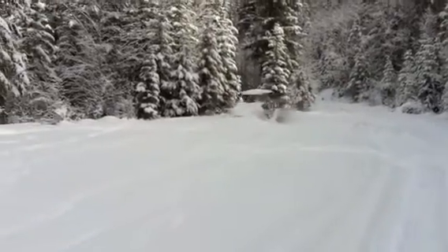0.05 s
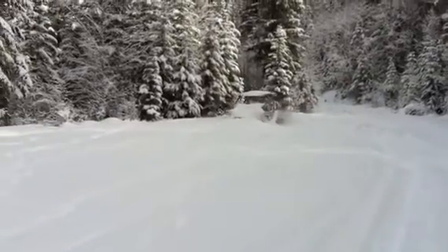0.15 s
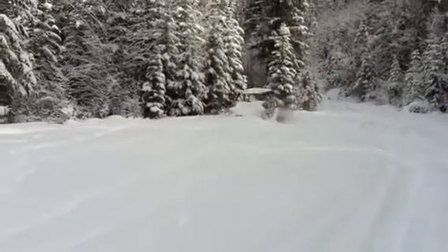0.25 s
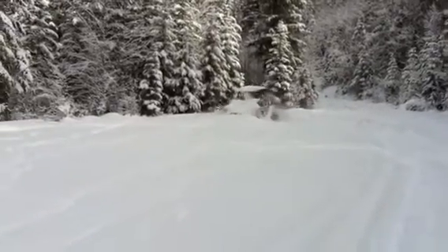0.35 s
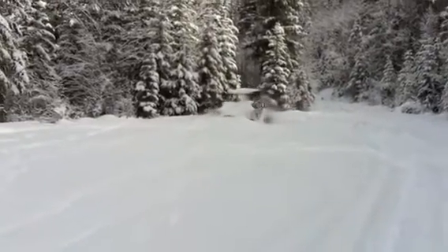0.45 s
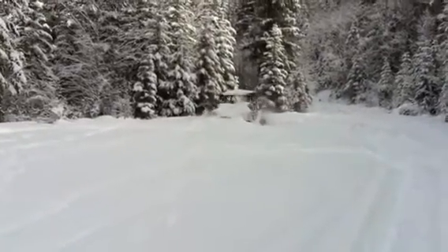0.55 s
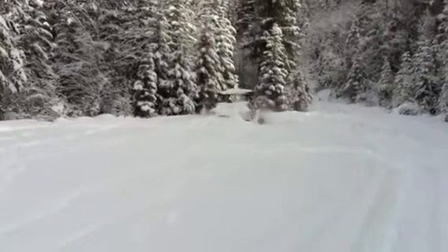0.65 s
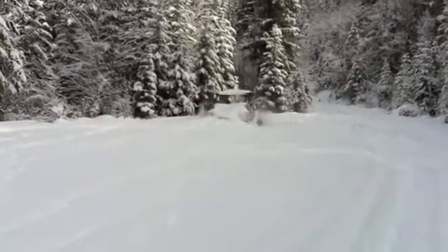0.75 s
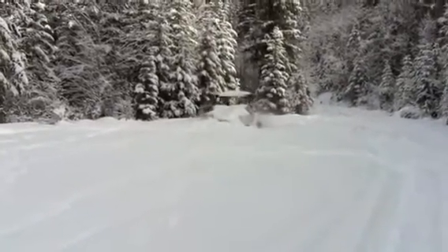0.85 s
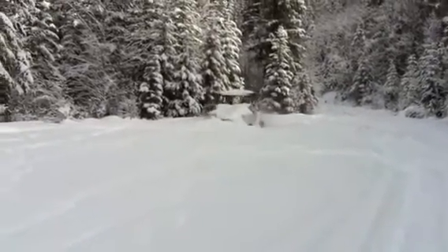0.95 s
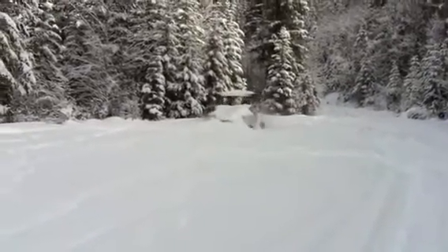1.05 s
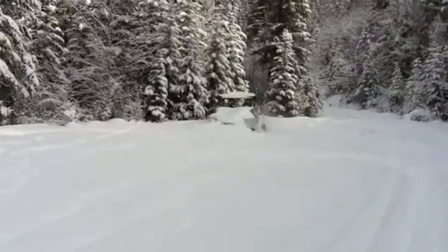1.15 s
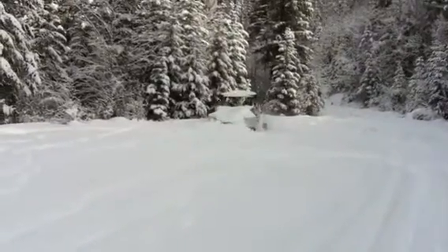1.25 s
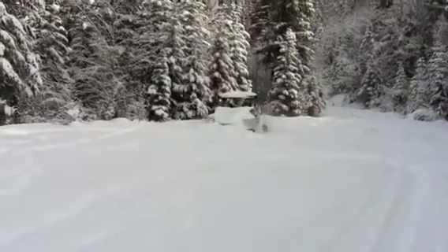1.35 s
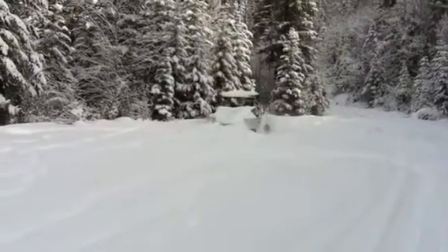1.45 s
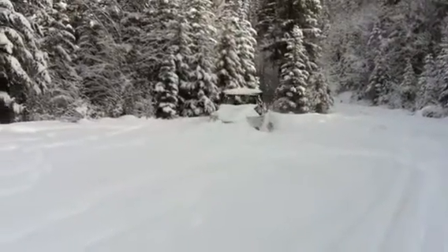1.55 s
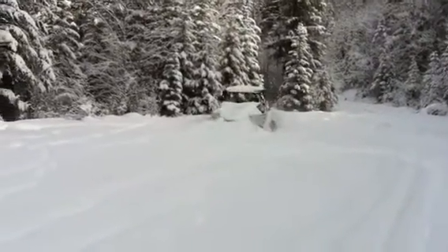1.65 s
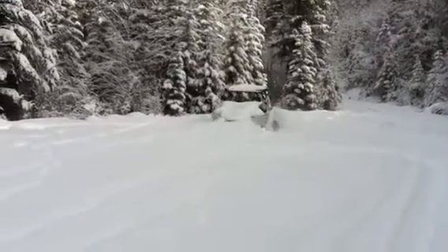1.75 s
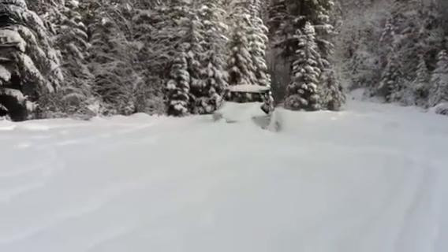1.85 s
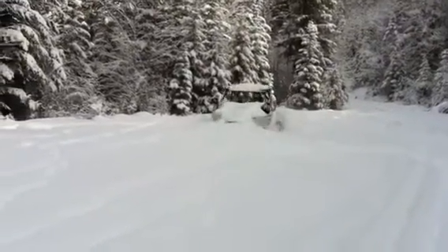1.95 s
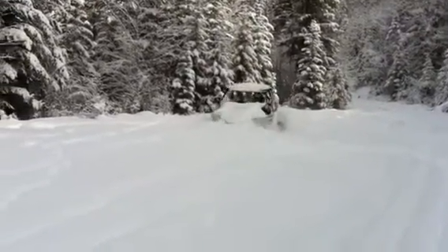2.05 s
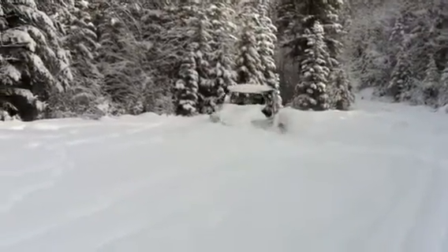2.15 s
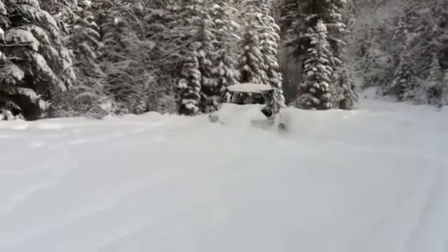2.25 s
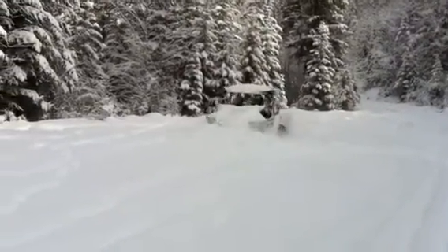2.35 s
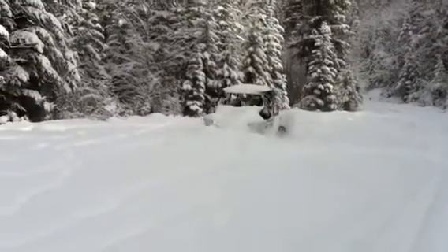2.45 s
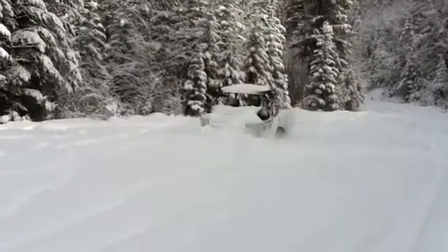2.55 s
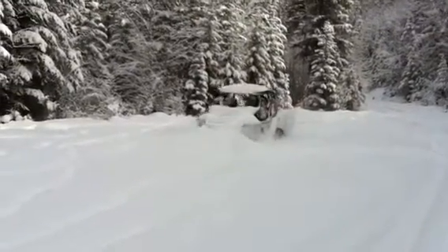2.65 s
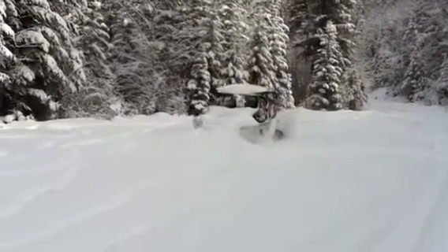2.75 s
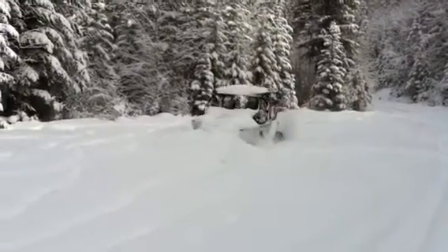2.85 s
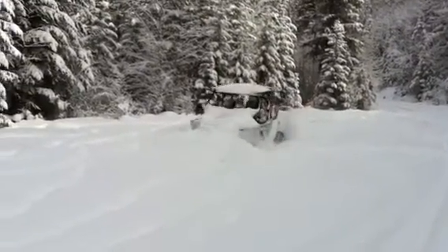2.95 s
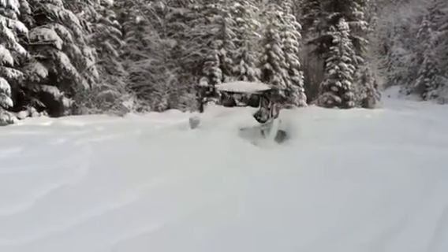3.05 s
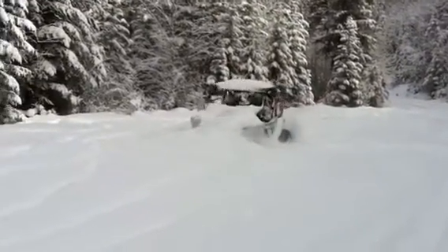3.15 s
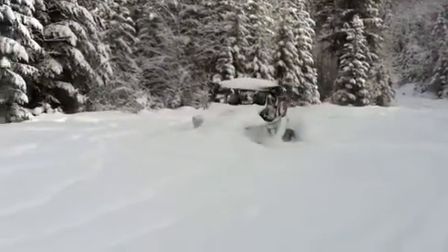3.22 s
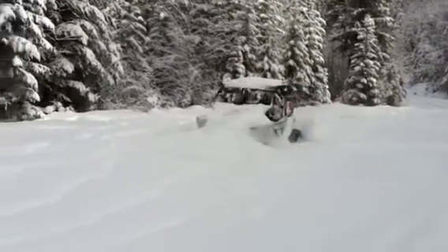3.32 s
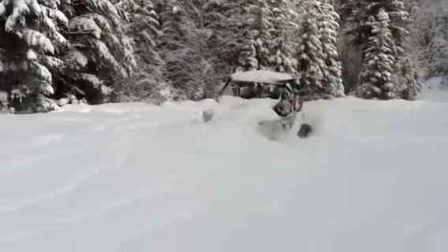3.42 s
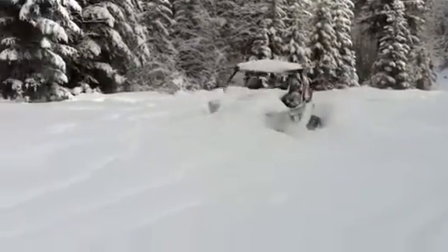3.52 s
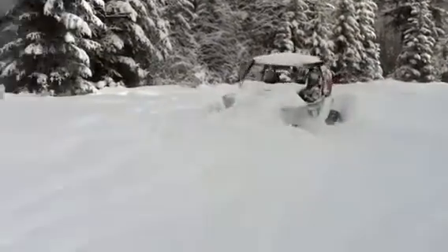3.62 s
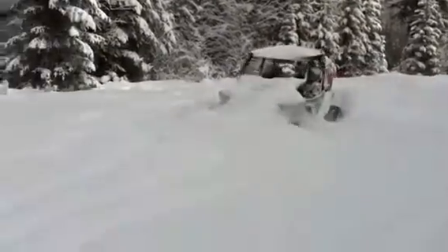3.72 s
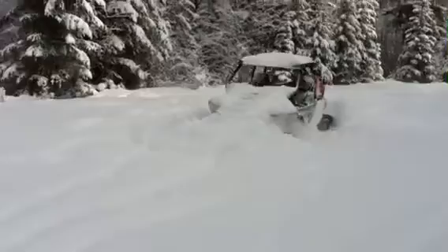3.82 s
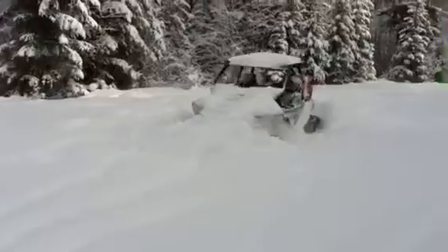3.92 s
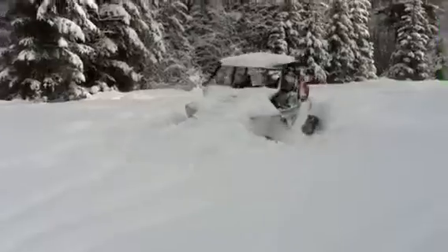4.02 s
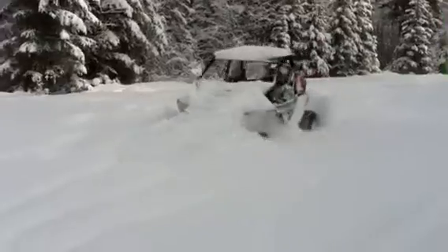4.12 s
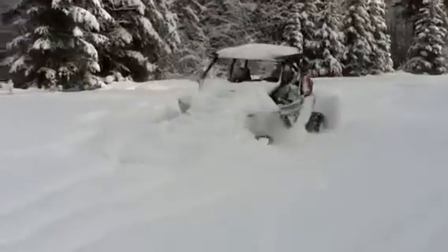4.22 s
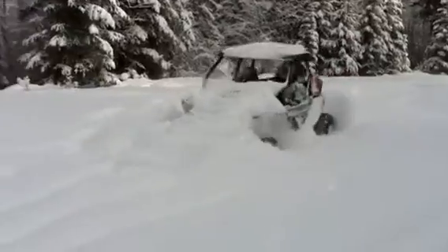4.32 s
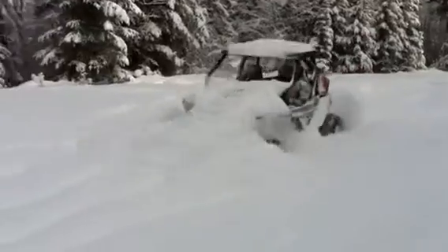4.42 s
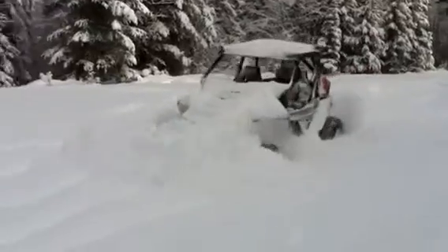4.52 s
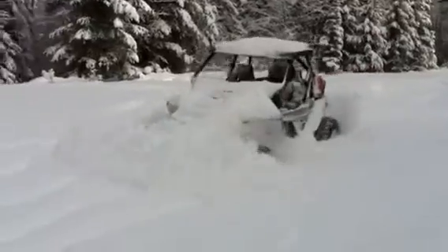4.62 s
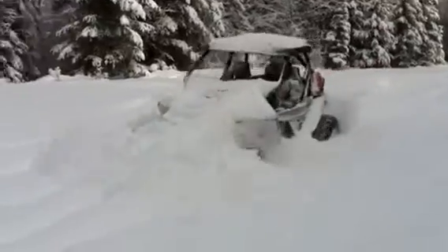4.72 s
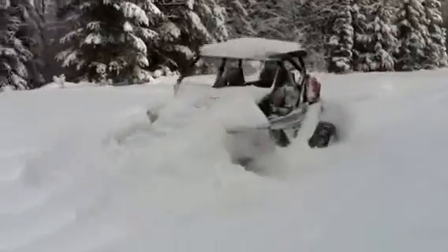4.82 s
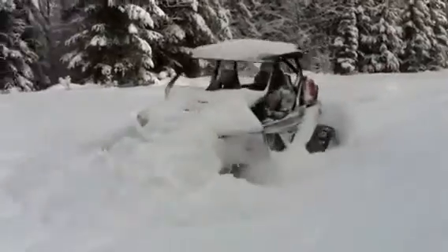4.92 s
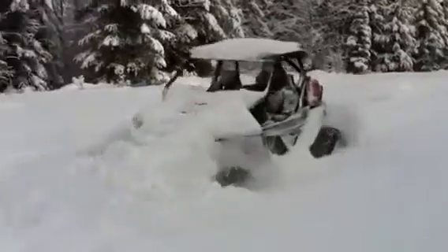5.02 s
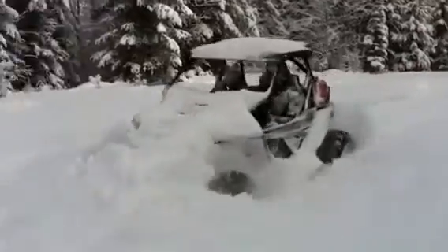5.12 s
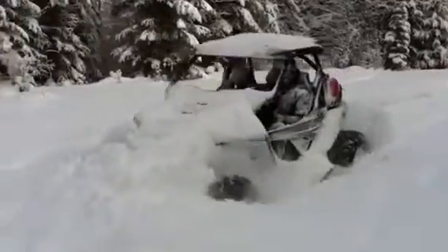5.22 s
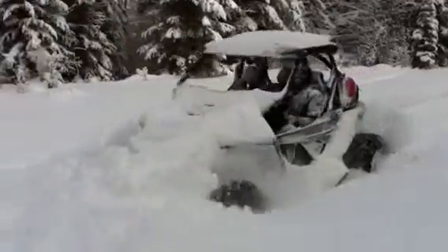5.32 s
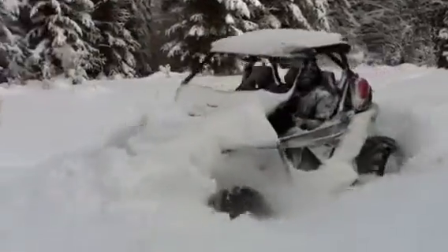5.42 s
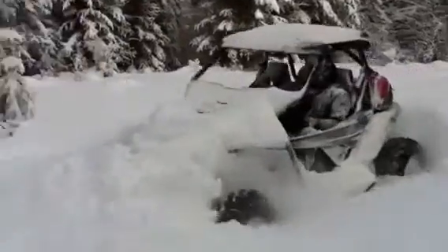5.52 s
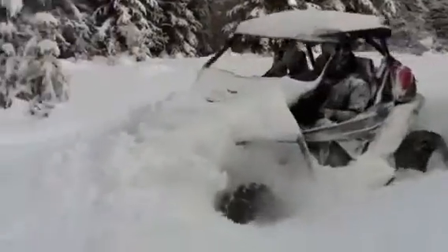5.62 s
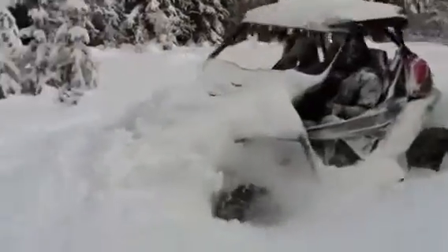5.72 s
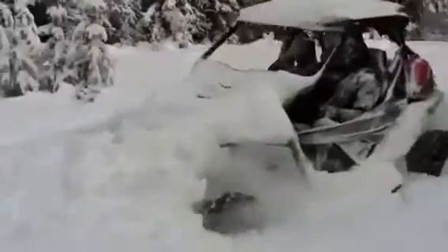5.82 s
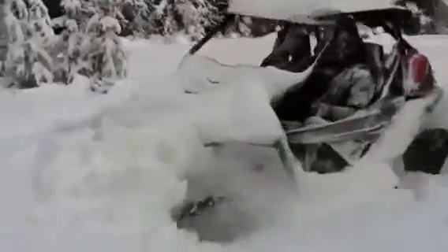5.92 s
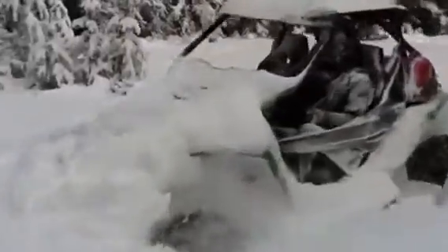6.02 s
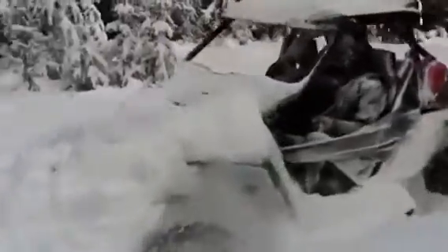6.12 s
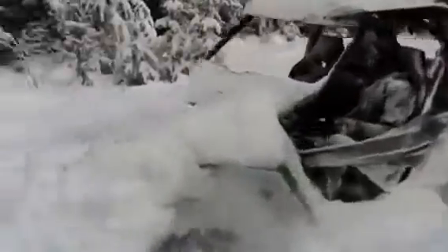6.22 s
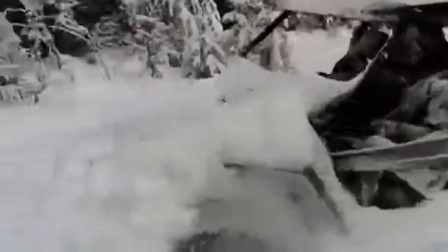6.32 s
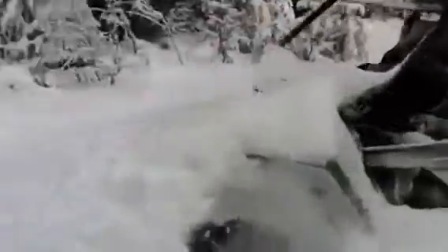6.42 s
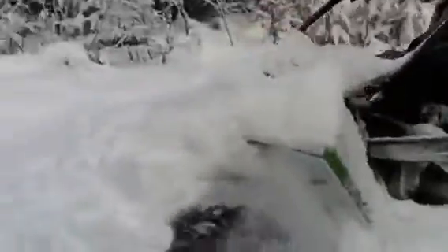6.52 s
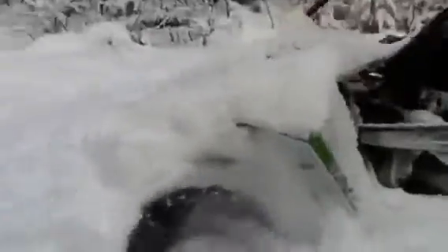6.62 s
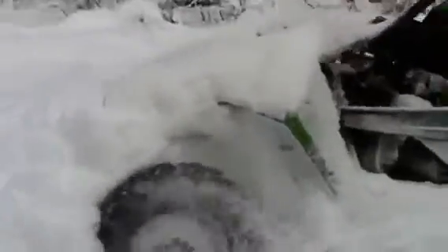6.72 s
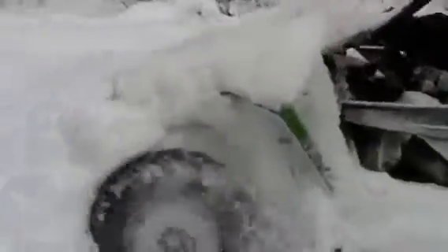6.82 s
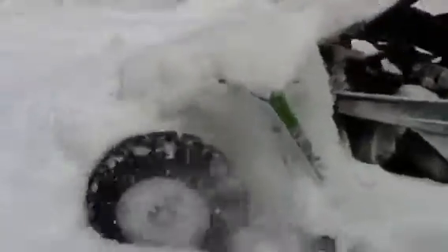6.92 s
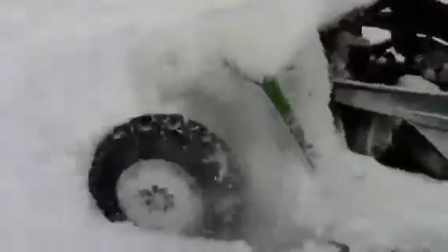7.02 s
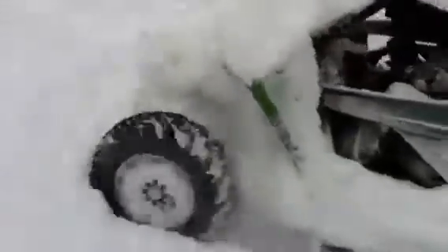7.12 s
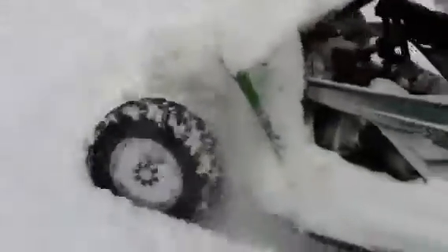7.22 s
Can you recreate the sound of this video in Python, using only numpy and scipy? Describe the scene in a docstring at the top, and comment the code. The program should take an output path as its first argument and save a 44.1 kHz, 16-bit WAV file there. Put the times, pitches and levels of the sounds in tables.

```python
"""A side-by-side buggy ploughs through deep snow, closing from about 25 m to under 5 m from the microphone.
Its four-stroke twin is held near 6000 rpm: summed orders of the firing cycle make the exhaust drone, noise
pulses make its puffs and the engine clatter, and a wavering sine makes the drive whine. Shaped noise hisses
as belt and thrown snow, coloured by a shifting reflection; tyres rumble and the chassis knocks."""
import sys
import numpy as np
from scipy import signal
from scipy.fft import rfft, irfft, next_fast_len
from scipy.io import wavfile
from scipy.ndimage import uniform_filter1d, map_coordinates

SR = 44100
rng = np.random.default_rng(int(sys.argv[2]) if len(sys.argv) > 2 else 0)


def wav_out(sig):
    """Save sig, one row per channel (or a flat mono array), as 16-bit PCM at SR to the path in sys.argv[1]."""
    wavfile.write(sys.argv[1], SR, np.round(np.clip(np.atleast_2d(sig).T, -1, 1) * 32767).astype(np.int16))


N = 320166
TIME = np.arange(N) / SR  # seconds

# Engine speed. Each row: time in seconds, four-stroke cycles per second.
ENGINE_SPEED = [(0.0, 49.2), (0.32, 48.6), (0.74, 50.3), (0.98, 49.5), (1.48, 50.5), (1.92, 50.2),
                (2.13, 50.8), (2.28, 50.5), (2.51, 49.3), (3.55, 49.6), (3.61, 50.1), (4.01, 50.1),
                (4.11, 49.6), (5.96, 49.8), (6.28, 49.2), (6.6, 49.7), (7.0, 49.6), (7.2, 51.0)]
# How the buggy's character changes. Each row: time in seconds, place (0 far, 1 midway, 2 close, 3 alongside;
# past 3 only the throb of hiss and spray still grows), extra delay of the reflection in ms.
PATH = [(0, 0.5, 0.28), (2.0, 0, 0.28), (3.2, 0.5, 0.28), (4.2, 0.2, 0.3), (5.1, 1, 0.29), (5.8, 2, 0.32),
        (6.25, 2, 0.32), (6.44, 2.5, 0.342), (6.7, 3, 0.36), (7.26, 4.5, 0.37)]
# How well the parts of the exhaust carry; alongside, the boom takes over.
# Each row: time in seconds, drone offset in dB, boom offset in dB, bark offset in dB.
EXHAUST_CARRY = [(0, -2, -3, 2), (.7, 0.5, -2.2, -1), (1.15, 1, 0, 0), (4.5, .6, 0.6, -.5),
                 (5.5, -2, -3.2, 0.5), (5.95, -1, -1.6, 1.5), (6.4, -4.5, 3, 1.5), (7.0, -11, 3.5, -1.5),
                 (7.25, -15, 4, -6)]
# Balance of the exhaust orders at each place, before the top is softened and each group is levelled.
# Each row: multiple of the cycle rate, relative level in dB.
ORDERS_FAR = [(1, -32), (2, -19), (3, -3), (4, 1), (5, 0), (6, -10.5), (7, -14), (8, -9.5), (9, -15.5),
              (10, -24), (11, -36), (12, -10), (13, -15.5), (14, -15), (15, -19), (16, -14), (17, -14.5),
              (18, -11), (19, -32)]
ORDERS_MIDWAY = [(1, -35), (2, -14.5), (3, -4.5), (4, -7), (5, 0), (6, -6), (7, -18), (8, -15.5),
                 (9, -15.5), (10, -12.5), (11, -13), (12, -17.5), (13, -15), (14, -31), (15, -13),
                 (16, -34), (17, -18), (18, -14), (19, -17)]
ORDERS_CLOSE = [(1, -39), (2, -17.5), (3, -10.5), (4, -8), (5, 0), (6, -3.5), (7, -16), (8, -12.5),
                (9, -10), (10, -12.5), (11, -14), (12, -21), (13, -11.5), (14, -19), (15, -9.5),
                (16, -26.5), (17, -10), (18, -25), (19, -7.5)]
ORDERS_ALONGSIDE = [(1, -39), (2, -17.5), (3, -20), (4, -17.5), (5, 0), (6, -14), (7, -7.5), (8, -7.5),
                    (9, -13.5), (10, -12), (11, -9.5), (12, -21.5), (13, -32), (14, -25.5), (15, -38),
                    (16, -33), (17, -36), (18, -35), (19, -35)]
# Silencer chambers; close up the note chugs, less smeared.
# Each row: resonance in Hz, width far off in Hz, width close up in Hz.
SILENCER_CHAMBERS = [(108, 30, 30), (220, 14, 80), (325, 22, 22), (720, 150, 300)]
# Spectrum of the exhaust gas. Each row: frequency in Hz, relative level in dB per Hz.
GAS_SPECTRUM = [(50, -34), (80, -15), (130, -12.5), (220, 2), (300, -2), (420, -2.5), (540, -4.5),
                (700, -13), (1100, -22)]
# Firing pulses. Each row: place in the cycle from 0 to 1, relative strength.
FIRINGS = [(.19, 0.8), (.6, 0.5)]
# Spectrum of the engine clatter at each place. Each row: frequency in Hz, relative level in dB per Hz.
CLATTER_FAR = [(310, -38), (520, -5.5), (591, -17), (649, -10), (709, -1), (909, 0), (1050, -5.5),
               (1140, -2.5), (1240, -6.5), (1770, -5), (2600, -17.5), (3380, -31), (5720, -120)]
CLATTER_MIDWAY = [(310, -42), (520, -10), (603, -8), (658, 6), (789, 0.5), (916, 0.5), (1230, -2.5),
                  (1350, -8), (1420, -6.5), (1830, -4), (2600, -25.5), (3380, -48), (5720, -120)]
CLATTER_CLOSE = [(310, -34), (520, -14), (583, -21), (632, -1), (789, 0), (922, -1.5), (1290, 0.5),
                 (1470, -6.5), (1780, -4), (2370, -10), (2600, -18), (3380, -31), (5720, -120)]
CLATTER_ALONGSIDE = [(310, -33), (520, -17), (600, -3), (800, -6), (1080, -7), (1260, -4), (1470, -6),
                     (1630, 1), (1860, -4), (2050, -20), (2300, -42), (3400, -55)]
# Drive whine. Each row: time in seconds, level in dB before its flutter, multiple of the cycle rate.
DRIVE_WHINE = [(0, -66, 26.9), (2.3, -73, 26.9), (2.9, -58, 26.9), (3.8, -58, 27.0), (4.6, -52.5, 26.8),
               (5.5, -55, 26.9), (6.3, -51, 25.9), (6.7, -38.5, 25.7), (7.26, -48, 24.4)]
# Spectrum of the hiss at each place. Each row: frequency in Hz, relative level in dB per Hz.
HISS_FAR = [(1700, 0.5), (2300, -4), (3000, 2), (3600, 4), (4250, 0.5), (4900, -6), (5450, -10.5),
            (5900, -11), (7000, -11), (9000, -64)]
HISS_MIDWAY = [(1700, 0), (2400, -9.5), (3000, -7), (3600, 4.5), (3900, 5), (4130, 1), (4400, 0.5),
               (4900, -2.5), (5250, 0), (5480, -4), (5750, -4.5), (6700, -20), (9000, -34.5)]
HISS_CLOSE = [(1700, -30), (2400, -1.5), (2750, -1.5), (3150, 7), (3500, -1.5), (3850, 3), (4080, 0),
              (4300, -5), (5000, -5.5), (5400, -6.5), (6000, -13), (6700, -5), (9000, -22)]
HISS_ALONGSIDE = [(1700, 0), (2300, -8), (2900, 1), (3400, -2), (3850, -1), (4300, -9), (5000, -6),
                  (5900, -1.5), (6700, -15.5), (9000, -40)]
# Resonances of the clutch housing under the hiss. Each row: frequency in Hz, width in Hz.
CLUTCH_HOUSING = [(4120, 130), (5460, 180)]
# Level of its two rings against the broad hiss; they fade as the buggy draws alongside.
# Each row: time in seconds, lower ring in dB, upper ring in dB.
HOUSING_RING = [(0, -19, -19), (2.5, -14, -19), (3.9, -22, -8.5), (4.7, -13, -10), (5.4, -20, -12.5),
                (6.1, -10.5, -21), (6.6, -37, -40)]
# Spectrum of the thrown snow, up to close and then alongside.
# Each row: frequency in Hz, relative level in dB per Hz.
SPRAY_SPECTRUM = [(4500, -30), (6200, -3.5), (7500, 0.5), (8600, -6), (10000, -8), (11500, -8),
                  (13000, -14), (14200, -7.5), (15700, -16)]
SPRAY_ALONGSIDE = [(4500, -30), (6200, -1), (7400, 1), (8500, -1), (11500, -2.5), (14200, -4.5),
                   (15700, -5)]
# Spectrum of the tyre rumble. Each row: frequency in Hz, relative level in dB per Hz.
TYRE_SPECTRUM = [(15, -8), (30, -3), (50, -1), (80, -3), (140, -8)]
# Knocks in the chassis. Each row: time in seconds, level in dB as the burst starts.
KNOCKS = [(2.887, -47), (5.725, -26), (6.168, -29), (7.138, -40)]

# A straight drive at a steady pace: when it would pass the microphone, and how far to the side
DRIVE_M_PER_S, PASS_S, PASS_M = 2.977, 8.39, 3
# Each source's base level: (dB at 10 m, dB gained each time the distance halves)
DRONE_LEVEL, BOOM_LEVEL, BARK_LEVEL = (-37.5, 11.1), (-36, 10.5), (-41.5, 14.5)
CHAMBER_LEVEL, CLATTER_LEVEL = (-53, 11), (-39.5, 11.22)
HISS_LEVEL, SPRAY_LEVEL, RUMBLE_LEVEL = (-45, 11.8), (-52.5, 13.6), (-71, 8.1)
# The drone swells with engine speed: dB per extra cycle per second
DRONE_DB_PER_HZ = 3
# The bark hardens as the engine speeds up and softens as it slows: dB per (cycle per second) each second
BARK_DB_PER_HZ_PER_S = 0.28
# The treble starts stronger and settles: how long it takes, and the extra dB at first
SETTLE_S, CLATTER_START_DB, HISS_START_DB, SPRAY_START_DB = 1.07, 3, 6.5, 8
HISS_ECHO, SPRAY_ECHO = .5, .42  # strength of the grazing reflection
START_CYCLE = 0.1714  # where in its cycle the engine starts (0-1), before its jitter
CUTOFF_HZ = 15800


def from_db(db):
    """Decibels to gain."""
    return 10 ** (np.asarray(db) / 20)


def rms_one(x):
    """Scale to rms 1."""
    return x / np.sqrt(np.mean(x ** 2) + 1e-20)


def in_time(rows):
    """Draw each column of a timed table as a curve over the samples."""
    seconds, *columns = np.transpose(rows)
    return [np.interp(TIME, seconds, column) for column in columns]


def drift(rate_hz):
    """Slow random wander of spread 1: noise through two equal low-pass poles, made at every 40th sample."""
    pole = np.exp(-80 * np.pi * rate_hz / SR)
    noise = rng.standard_normal(N // 40 + 2002)
    slow = signal.lfilter([1], [1, -2 * pole, pole * pole], noise)[2000:]  # drop the run-in
    return np.interp(np.arange(N) / 40, np.arange(len(slow)), rms_one(slow))


def colour(x, spectrum):
    """Shape a sound by a spectrum, with next to nothing past its ends; rms 1."""
    size = next_fast_len(N)
    hz, level_db = np.transpose(spectrum)
    log_hz = np.log(np.arange(size // 2 + 1) * SR / size + 1)  # +1 avoids log of zero
    gain = from_db(np.interp(log_hz, np.log(hz), level_db, left=-90, right=-90))
    return rms_one(irfft(rfft(x, size) * gain, size)[:N])


def blend(place, aspects):
    """Cross-fade between the far, midway, close and alongside aspects of the buggy."""
    place = np.clip(place, 0, len(aspects) - 1)
    return sum(np.clip(1 - abs(place - k), 0, 1) * aspect for k, aspect in enumerate(aspects))


def throb(cycle, pulses, width, depth):
    """Envelope with a bump, width in cycles, at each pulse over a steady base; rms 1."""
    bumps = 0
    for at, strength in pulses:
        from_peak = np.cos(2 * np.pi * (cycle - at)) - 1
        bumps = bumps + strength * np.exp(from_peak / (2 * np.pi * width) ** 2)
    return rms_one(1 + depth * bumps)


def approach(level, extra_db=0):
    """Gain as the buggy closes in; soft snow makes sound fall off faster than in open air."""
    db_at_10_m, db_per_halving = level
    distance_m = np.hypot(PASS_M, DRIVE_M_PER_S * (PASS_S - TIME))
    return from_db(db_at_10_m - db_per_halving * np.log2(distance_m / 10) + extra_db)


def exhaust_orders(cycle, place, group, shake, shake_rate_hz=9, soften_hz=720):
    """Harmonics of the firing cycle, phase-smeared by the silencer and shaken by uneven burning."""
    out, power = 0, 0
    closeness = np.clip(place - .7, 0, 1)
    tables = (ORDERS_FAR, ORDERS_MIDWAY, ORDERS_CLOSE, ORDERS_ALONGSIDE)
    for order in group:
        hz = order * np.mean(np.array(ENGINE_SPEED)[:, 1])
        level_db = blend(place, [np.interp(order, *np.transpose(table)) for table in tables])
        # the top orders dissolve into the clatter
        gain = from_db(level_db) / np.hypot(1, (hz / soften_hz) ** 2)
        lag_far, lag_close = sum(2 * np.arctan(2 * (hz - centre) / np.array(widths))
                                 for centre, *widths in SILENCER_CHAMBERS)
        lag = lag_far + closeness * (lag_close - lag_far)
        angle = 2 * np.pi * order * cycle - lag
        steady = (1 + shake * drift(shake_rate_hz)) * np.cos(angle)
        unsteady = shake * drift(shake_rate_hz) * np.sin(angle)
        out = out + gain * (steady + unsteady)
        power = power + gain ** 2 * (1 / 2 + shake ** 2)
    return out / np.sqrt(power)  # expected rms 1


def chambers(ring_hz=224, width_hz=22):
    """Uneven burning stirs the middle silencer chamber: noise rings through two resonators, amid the drone."""
    b, a = signal.iirpeak(ring_hz, ring_hz / width_hz, fs=SR)
    once = signal.lfilter(b, a, rng.standard_normal(N))
    return approach(CHAMBER_LEVEL) * rms_one(signal.lfilter(b, a, once))


def exhaust(cycle, place, speed):
    """Clean low orders, a boom on the pipe resonance, rougher upper orders and a puff of gas each cycle."""
    drone_db, boom_db, bark_db = in_time(EXHAUST_CARRY)
    throttle_db = DRONE_DB_PER_HZ * (speed - speed.mean())
    pull_db = BARK_DB_PER_HZ_PER_S * uniform_filter1d(np.gradient(speed) * SR, size=SR // 8)
    drone = exhaust_orders(cycle, place, range(1, 5), shake=0.12)
    drone = approach(DRONE_LEVEL, drone_db + throttle_db) * drone
    boom = approach(BOOM_LEVEL, boom_db) * exhaust_orders(cycle, place, [5], shake=0.033)
    bark = exhaust_orders(cycle, place, range(6, 20), shake=0.36, shake_rate_hz=11.2)
    puffs = throb(cycle, [(.1, 0.61)], width=0.086, depth=2)
    gas = colour(rng.standard_normal(N) * puffs, GAS_SPECTRUM)
    rough = approach(BARK_LEVEL, bark_db + pull_db) * (bark + from_db(-6) * gas)
    flutter = from_db(0.33 * drift(29))
    return (drone + boom + chambers() + rough) * flutter


def rattle(cycle, regular, size=900):
    """Valves and pistons: one share of the noise recurs with the cycle, the rest is always new."""
    regular = np.clip(regular, 0, 1)
    at = (cycle % 1) * size
    # four looped noise patterns drift in and out
    repeating = sum(drift(1.57) * np.interp(at, np.arange(size), pattern)
                    for pattern in rng.standard_normal((4, size)))
    return np.sqrt(regular) * rms_one(repeating) + np.sqrt(1 - regular) * rng.standard_normal(N)


def clatter(cycle, place):
    """Each firing shakes the engine casing and body panels, some harder than others."""
    strokes = throb(cycle, FIRINGS, width=.075, depth=1.5)
    blows = rattle(cycle, regular=0.25) * strokes * from_db(0.3 * drift(45))
    spectra = (CLATTER_FAR, CLATTER_MIDWAY, CLATTER_CLOSE, CLATTER_ALONGSIDE)
    return blend(place, [colour(blows, spectrum) for spectrum in spectra])


def whine(speed, wander_cycles=0.2):
    """A wavering sine for the gears, sagging against the engine speed as the belt drive shifts."""
    level_db, ratio = in_time(DRIVE_WHINE)
    angle = 2 * np.pi * (np.cumsum(ratio * speed) / SR + wander_cycles * drift(12))
    return from_db(level_db + 2.1 * drift(18)) * np.sqrt(2) * np.sin(angle)


def reflected(x, delay_ms, strength):
    """A grazing reflection arrives inverted and cuts evenly spaced notches; rms 1."""
    echo = map_coordinates(x, [np.arange(N) - delay_ms * SR / 1000], order=3)
    return rms_one(x - strength * echo)


def hiss(cycle, place, delay_ms):
    """Belt and valve-gear noise, throbbing more clearly close up, with the clutch housing's forward ring."""
    pulses = [(.2, 0.72), (.58, 0.65)]  # (place in the cycle, strength)
    air = rng.standard_normal(N) * throb(cycle, pulses, width=0.086, depth=0.31 + 0.079 * place ** 2)
    air = air * from_db(0.72 * drift(27))
    spectra = (HISS_FAR, HISS_MIDWAY, HISS_CLOSE, HISS_ALONGSIDE)
    broad = blend(place, [colour(air, spectrum) for spectrum in spectra])
    ring = 0
    for (hz, width_hz), level_db in zip(CLUTCH_HOUSING, in_time(HOUSING_RING)):
        b, a = signal.iirpeak(hz, hz / width_hz, fs=SR)
        ring = ring + from_db(level_db) * rms_one(signal.lfilter(b, a, air))
    return reflected(broad + ring, delay_ms, HISS_ECHO)


def spray(cycle, place, delay_ms):
    """Uneven fine noise of thrown snow, pulsed by the top of the engine's ticking; brighter alongside."""
    grains = rng.standard_normal(N) * from_db(0.61 * drift(250) + .3 * drift(19))
    pulses = [(.23, 0.64), (.58, 0.9)]  # (place in the cycle, strength)
    grains = grains * throb(cycle, pulses, width=0.079, depth=0.17 + 0.13 * place ** 2)
    far, alongside = colour(grains, SPRAY_SPECTRUM), colour(grains, SPRAY_ALONGSIDE)
    return reflected(blend(place, [far, far, far, alongside]), delay_ms, SPRAY_ECHO)


def tyres():
    """Packed snow under the tyres: a soft rumble of low noise."""
    return approach(RUMBLE_LEVEL) * colour(rng.standard_normal(N), TYRE_SPECTRUM)


def chassis(t60_s=0.069):
    """The suspension works: short bursts of dull mid-band noise, each dying 60 dB in t60_s."""
    bursts = sum(from_db(level_db - 60 * abs(TIME - start) / t60_s) * (TIME >= start)
                 for start, level_db in KNOCKS)
    panel = signal.butter(2, [550, 1500], "band", fs=SR, output="sos")
    return bursts * rms_one(signal.sosfilt(panel, rng.standard_normal(N)))


def scene():
    """The engine's sources share one crankshaft and nearly all layers grow as the buggy nears."""
    speed, = in_time(ENGINE_SPEED)
    cycle = START_CYCLE + np.cumsum(speed) / SR + 0.0042 * drift(11.6)  # cycles turned, with jitter
    place, delay_ms = in_time(PATH)
    early = np.clip(1 - TIME / SETTLE_S, 0, 1)
    casing = approach(CLATTER_LEVEL, CLATTER_START_DB * early ** 2) * clatter(cycle, place)
    engine = exhaust(cycle, place, speed) + casing + whine(speed)
    belt = approach(HISS_LEVEL, HISS_START_DB * early) * hiss(cycle, place, delay_ms)
    snow = approach(SPRAY_LEVEL, SPRAY_START_DB * early) * spray(cycle, place, delay_ms)
    return (engine + belt + snow + tyres() + chassis())[None]  # one channel


def record(dry):
    """A steep elliptic low-pass cuts the top."""
    return signal.sosfilt(signal.ellip(12, .1, 80, CUTOFF_HZ, fs=SR, output="sos"), dry)


dry = scene()
out = record(dry)
wav_out(out)
```